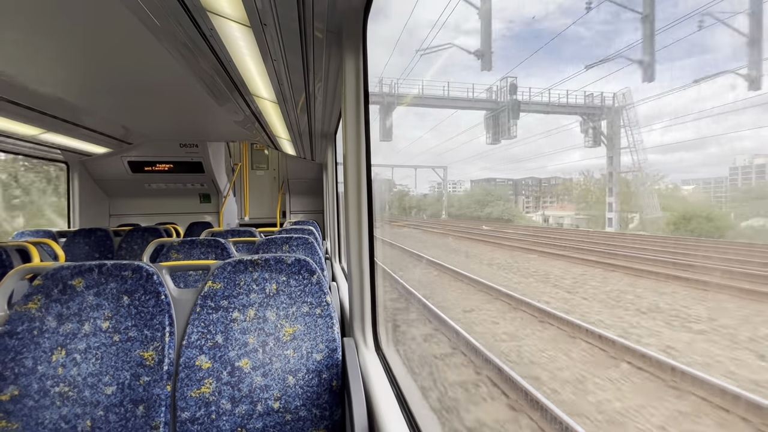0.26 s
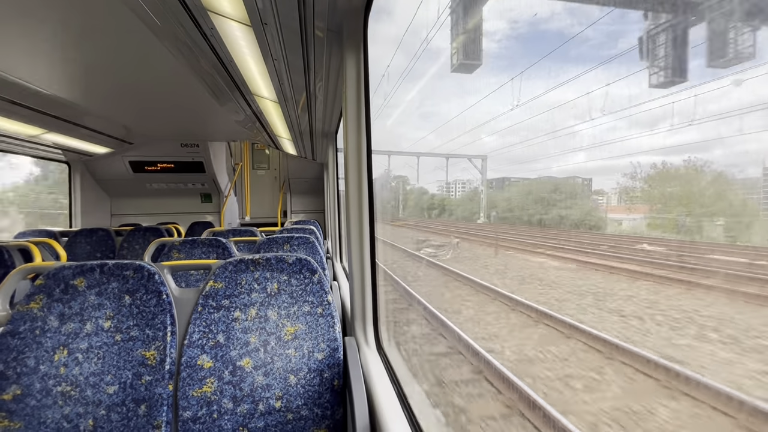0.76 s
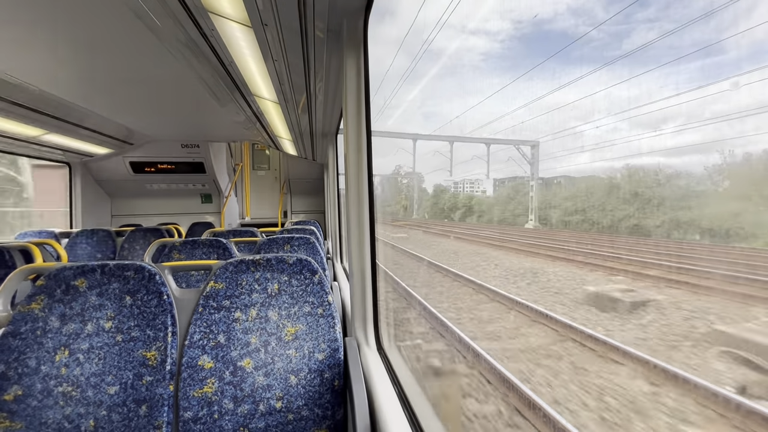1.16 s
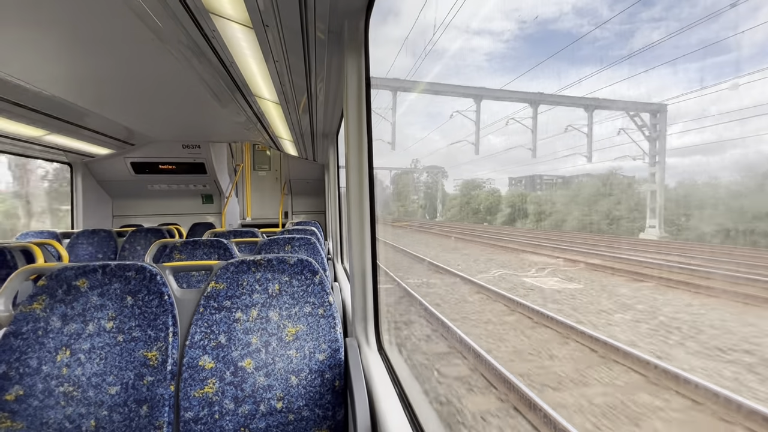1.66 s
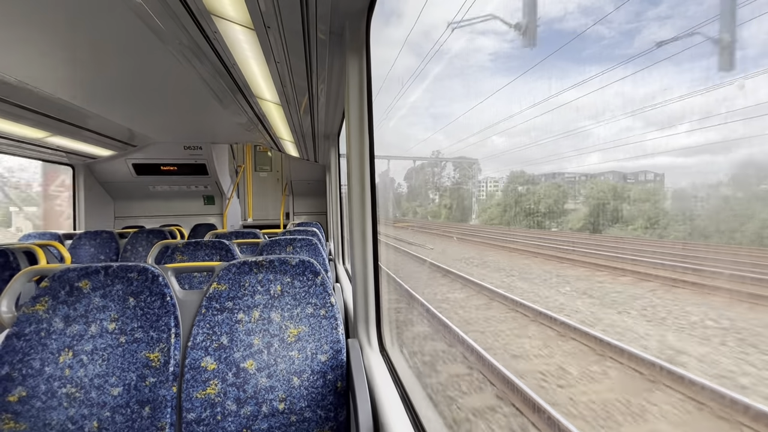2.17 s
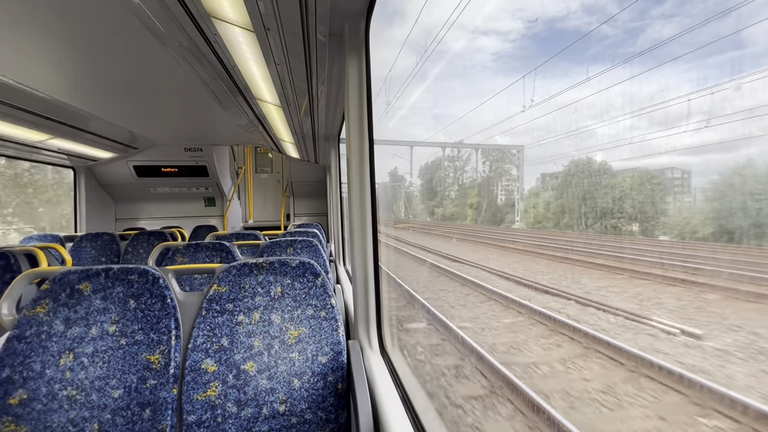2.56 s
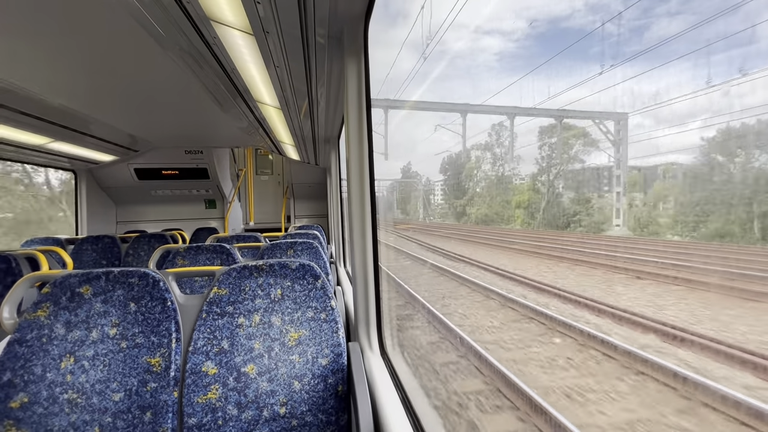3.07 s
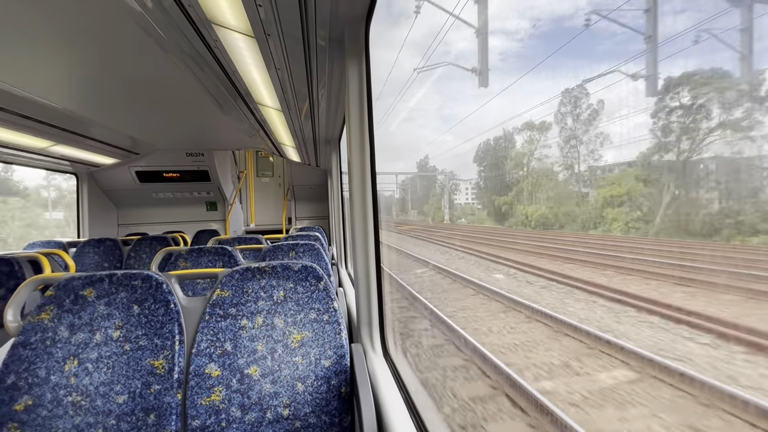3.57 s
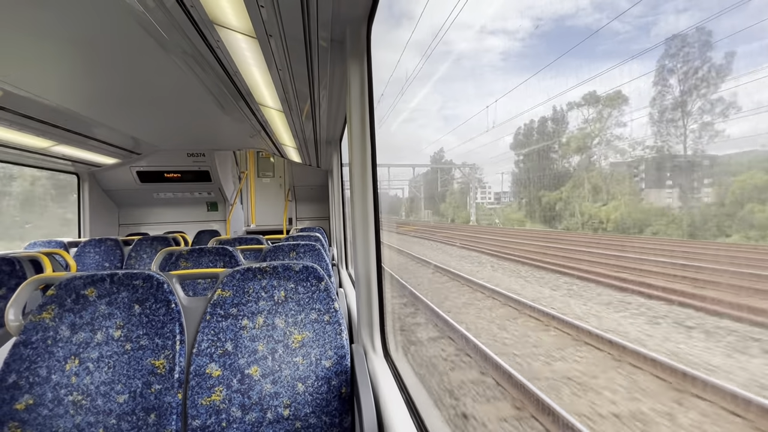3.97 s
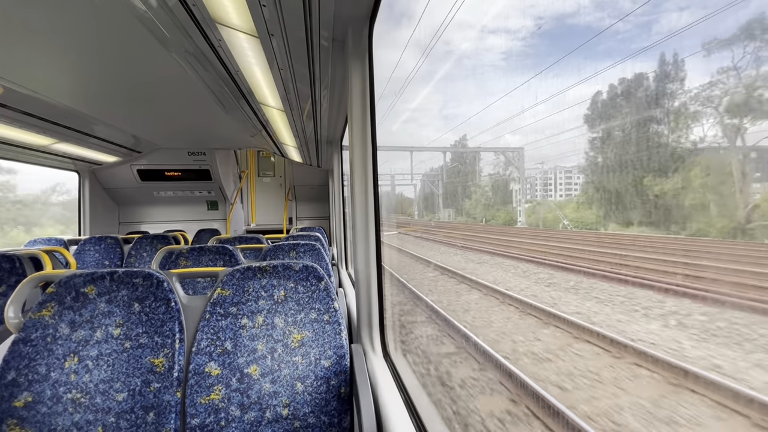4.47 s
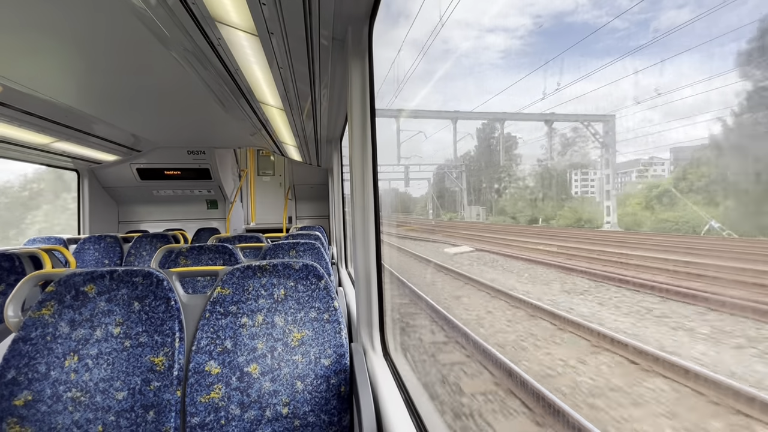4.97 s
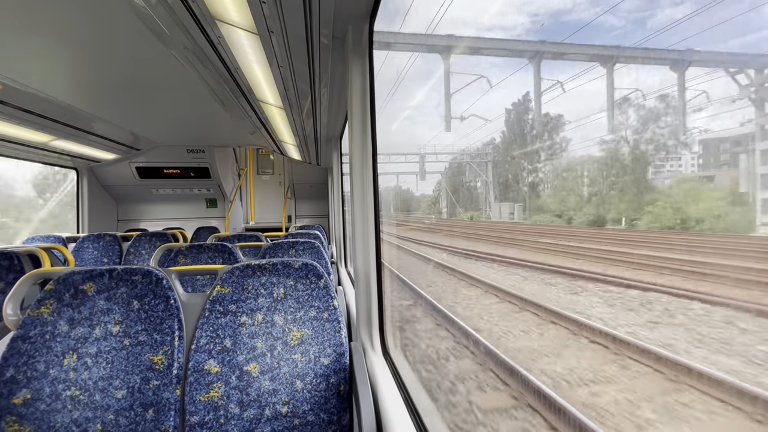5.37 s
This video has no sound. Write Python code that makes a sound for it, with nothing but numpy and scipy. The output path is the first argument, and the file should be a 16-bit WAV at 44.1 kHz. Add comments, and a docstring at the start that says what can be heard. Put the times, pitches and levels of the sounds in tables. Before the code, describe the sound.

Interior of an electric passenger train at steady speed, heard in stereo from a window seat. A deep boom throbs with irregular soft thuds, wall panels drone, and wheels roar through the floor, roughest at the start. Faint motor hums and a steady whine sit inside. Ventilation hisses thinly above. One sharp plastic tick comes close by early on; a light rattle comes near the end.

```python
"""Electric train interior

An electric passenger train runs steadily on welded track, heard from a window seat.
Bumps jolt the shell's boom and the large wall panels; smaller panels drone above.
Shaped noise roars through floor and wheels; machine hums are wavering sines.
Ventilation hisses with a thin, fluttering whistle of narrow noise bands.
Close by, decaying sines make one sharp tick; swells of bright noise make faint rustles and a light rattle."""
import sys
import numpy as np
from scipy import signal
from scipy.fft import rfft, irfft
from scipy.io import wavfile
from scipy.ndimage import uniform_filter1d

SR = 44100
rng = np.random.default_rng(int(sys.argv[2]) if len(sys.argv) > 2 else 0)


def output_pcm(signal):
    """Save a mono or channel-first signal as 16-bit PCM at the path in sys.argv[1].

    Samples are clipped to [-1, 1] before scaling.
    """
    pcm = np.clip(np.atleast_2d(signal).T, -1, 1) * 32767
    wavfile.write(sys.argv[1], SR, np.round(pcm).astype(np.int16))


N = 247401
T, HZ = np.arange(N) / SR, np.fft.rfftfreq(N, 1 / SR)


def amp(db):
    """Decibels to gain."""
    return 10 ** (np.asarray(db) / 20)


def unit(x):
    """Scales a sound to rms 1."""
    return x / np.sqrt(np.mean(x ** 2) + 1e-20)


def over_time(rows):
    """Joins (time [s], value) rows by straight lines with rounded corners."""
    line = np.interp(T, *np.transpose(rows))
    return uniform_filter1d(uniform_filter1d(line, size=800), size=800)


def over_hz(rows):
    """Joins (frequency [Hz], value) rows on a log-frequency axis."""
    hz, value = np.transpose(rows)
    return np.interp(np.log(HZ + 1), np.log(hz + 1), value)


def pan(side_db):
    """Left and right gains for a left-right level difference."""
    return amp(np.array([[side_db], [-side_db]]) / 2)


def drift(rate_hz):
    """A slow random wander of rms 1."""
    lowpass = np.exp(-(HZ / rate_hz) ** 2) * (HZ > 0)
    return unit(irfft(rfft(rng.standard_normal(N)) * lowpass, N))


def peak(hz, width_hz):
    """Magnitude of one resonance, 1 at its centre, -3 dB at the edges of its width."""
    return 1 / np.sqrt(1 + (2 * (HZ - hz) / width_hz) ** 2)


def cabin_noise(gain):
    """Stereo noise of rms 1 filling the car: long waves reach both sides alike, short ones diffusely."""
    # left-right likeness: (frequency [Hz], correlation [0-1])
    likeness = [(100, .993), (200, .985), (330, .92), (430, .55), (520, .15), (660, .42), (950, .12),
                (1290, .42), (1480, .15), (1630, .33), (1850, .08), (9000, .02)]
    # phase by which left leads: (frequency [Hz], lead [rad])
    lead = [(60, 0), (430, -.05), (620, -1.4), (900, -1.2), (1250, -3.5), (1600, -4.7), (2000, -6.2)]
    # left-right balance: (frequency [Hz], difference [dB])
    balance = [(60, -2), (190, -0.5), (300, -2.5), (430, -1), (640, -4), (800, 0.5), (1100, 2), (1700, 2.5),
               (2600, 3), (3800, 7.5), (6600, 7), (7600, 5), (8700, -1.5), (10000, -1.5)]
    left, other = rng.standard_normal((2, len(HZ))) + 1j * rng.standard_normal((2, len(HZ)))
    same = np.clip(over_hz(likeness), 0, 1)
    right = same * left + np.sqrt(1 - same ** 2) * other
    right = right * np.exp(-1j * over_hz(lead))
    lean = amp(over_hz(balance) / 2)
    gain = gain / (1 + (HZ / 12000) ** 24)  # the very top rolls off
    return unit(irfft(np.array([left * lean, right / lean]) * gain, N))


def steadied(x, size):
    """Evens out swells longer than size samples, so that a level curve can drive the noise."""
    window = signal.windows.hann(size)
    energy = signal.fftconvolve((x ** 2).mean(0), window, "same")
    power = energy / signal.fftconvolve(np.ones(N), window, "same")
    return x / np.sqrt(abs(power) + 1e-9)


def wavering(x, wander_hz, rate_hz):
    """Lets the pitch of a ringing sound wander by wander_hz rms, by turning its analytic signal."""
    turn = np.exp(2j * np.pi * np.cumsum(wander_hz * drift(rate_hz)) / SR)
    return (signal.hilbert(x) * turn).real


def surges(rows, rise_s, fall_s):
    """Lift in dB from (time [s], lift [dB]) events that each swell to their peak and die away."""
    return sum(db * np.exp(-((T - s) / np.where(T < s, rise_s, fall_s)) ** 2) for s, db in rows)


def bursts(rows, length_s, width_share):
    """Short swells of narrow noise from (time [s], level [dB], frequency [Hz]) events."""
    out = np.zeros((2, N))
    for s, db, hz in rows:
        noise = steadied(cabin_noise(peak(hz, width_share * hz) ** 2), size=2500)
        out += noise * amp(db) * np.exp(-((T - s) / length_s) ** 2)
    return out


def hum(rows):
    """Sustained sines, each wavering in pitch and strength."""
    out = np.zeros((2, N))
    for hz, db, side_db, lag_rad, waver_db, wander_hz in rows:
        cycles = np.cumsum(hz + wander_hz * drift(rate_hz=3.57)) / SR
        phase = 2 * np.pi * (cycles + rng.random())
        tone = np.sqrt(2) * np.sin([phase, phase - lag_rad]) * pan(side_db)
        out += tone * amp(db + waver_db * drift(rate_hz=5.6))
    return out


def jolt_lift_db():
    """Bumps in the track jolt the car; every jolt builds up and dies away alike."""
    # bumps: (time [s], lift of the boom's drive [dB])
    jolts = [(.139, 7), (.19, 4.5), (.264, 9), (.374, 9.5), (.425, 9.5), (.608, 6.5), (.714, 4.5),
             (.772, 6.5), (.937, 9.5), (1.087, 8.5), (1.158, 7), (1.277, 10), (1.34, 7.5), (1.418, 8.5),
             (1.52, 10.5), (1.616, 8), (1.828, 6.5), (2.031, 6), (2.09, 7), (2.243, 8.5), (2.347, 6.5),
             (2.442, 5), (2.595, 8), (2.702, 7), (2.83, 10.5), (2.924, 9), (3.17, 8.5), (3.308, 9),
             (3.412, 10), (3.503, 7.5), (3.589, 2.5), (3.751, 3), (3.863, 7.5), (3.994, 2), (4.12, 6.5),
             (4.22, 4), (4.282, 4.5), (4.354, -0.5), (4.457, 2.5), (4.595, 4.5), (4.711, 8), (4.808, 7),
             (4.951, 4), (5.02, 4), (5.205, 7.5), (5.305, 6.5), (5.438, 8)]
    return surges(jolts, rise_s=0.025, fall_s=0.025)


def car_body(throb_db=-0.5, top_hz=112, bottom_hz=30):
    """Track and traction motors keep the shell booming; each bump jolts it into a short, deep thud."""
    # boom spectrum: (frequency [Hz], relative level [dB])
    boom = [(12, -53.5), (22, -31), (32, -20.5), (43, -11), (54, -2.5), (63, 5), (73, -7), (88, -4),
            (100, -9.5), (115, -27), (170, -61.5)]
    # traction motors: (frequency [Hz], level against the boom at 0 dB load [dB], left-right [dB],
    # right-side phase lag [rad], rms waver [dB], rms pitch wander [Hz])
    motor_hums = [(76.76, -2.5, -1, 0.0051, 1.5, 0.25), (85.24, -5.5, 0, 0.009, 1.1, 0.34)]
    # load on the motors, taken up part way through: (time [s], hum gain [dB])
    motor_load = [(0, -6), (1.3, -11), (2.1, 0), (2.9, 1), (4.8, 5), (5.61, -3)]
    # drive of the shell without jolts: (time [s], level [dB])
    boom_level = [(0, -31.5), (2, -31.5), (4.8, -27.5), (5.61, -30.5)]
    drive = cabin_noise(amp(over_hz(boom))) + hum(motor_hums) * amp(over_time(motor_load))
    level_db = over_time(boom_level) + jolt_lift_db() + throb_db * drift(rate_hz=14)
    shell = 1 / np.sqrt((1 + (HZ / top_hz) ** 16) * (1 + (bottom_hz / (HZ + 1)) ** 8))
    return irfft(rfft(steadied(drive, size=1900) * amp(level_db)) * shell, N)


def panels(wall_db=-34.5, wall_hz=121, wall_width_hz=28, lurch_s=0.051, jolt_share=0.36):
    """The large wall panels lurch on one low resonance; the smaller ones drone above it."""
    # swells and lulls of the wall as the car lurches: (time [s], lift [dB])
    lurches = [(.1, 3), (.46, -10), (.88, -3.5), (1.2, -5), (1.65, 2.5), (1.87, -4), (2.08, 0), (2.86, 4.5),
               (3.05, -6), (3.36, 2), (3.84, -15), (4.17, -5), (4.72, 2), (4.88, -2), (5.14, -4.5)]
    # drone spectrum: (frequency [Hz], relative level [dB])
    drone_spectrum = [(120, -36.5), (150, -5.5), (185, -2.5), (203, -6), (232, -1), (258, -9.5), (295, -12),
                      (335, -10.5), (380, -17), (440, -17), (700, -77.5)]
    # drone from one stretch of track to the next: (time [s], level [dB])
    drone_level = [(0, -36.5), (.25, -32.5), (.52, -36), (.8, -33), (1.1, -35), (1.55, -32), (1.72, -35),
                   (1.84, -32), (2.55, -35), (3.5, -34), (4.25, -34.5), (4.4, -33.5), (5.05, -33.5),
                   (5.2, -34), (5.61, -35.5)]
    lift_db = surges(lurches, lurch_s, lurch_s) + jolt_share * jolt_lift_db()
    wall = steadied(cabin_noise(peak(wall_hz, wall_width_hz) ** 2), size=4500)
    drone = steadied(cabin_noise(amp(over_hz(drone_spectrum))), size=5000)
    return wall * amp(wall_db + lift_db) + drone * amp(over_time(drone_level))


def floor_roar(trim_db=-0.93):
    """The dull roar of the track, muffled by the floor."""
    # roar spectrum: (frequency [Hz], relative level [dB])
    roar_spectrum = [(250, -23.5), (380, -8.5), (440, 3), (490, 5.5), (540, -1.5), (600, -0.5), (645, 1),
                     (700, 1.5), (770, -6), (900, -25), (1400, -64)]
    # roar through the floor: (time [s], level before trim [dB])
    floor_level = [(0, -41.5), (0.65, -43), (2.25, -43.5), (2.7, -44), (3.7, -45.5), (4.05, -44),
                   (4.7, -42.5), (5.61, -45.5)]
    roar = steadied(cabin_noise(amp(over_hz(roar_spectrum))), size=14000)
    return roar * amp(over_time(floor_level) + trim_db)


def wheel_rings(wander_share=0.01405, shift_hz=7, swell_db=2.5):
    """The contact patch roams over the tread, so each ring comes and goes and shifts in pitch."""
    # wheel and rail rings: (frequency [Hz], width at -6 dB [Hz], relative level at the start [dB],
    # growth [dB/s])
    wheel_modes = [(663, 85, -12.5, 0), (929, 100, -9, 0.35), (1111, 69, -12, 0.17), (1635, 55, -13.5, -1),
                   (1882, 120, -16, 0)]
    out = np.zeros((2, N))
    for hz, width_hz, db, growth in wheel_modes:
        ring = wavering(cabin_noise(peak(hz, width_hz) ** 2), wander_share * hz, shift_hz)
        out += ring * amp(db + growth * T + swell_db * drift(shift_hz))
    return out


def wheels(trim_db=0.42, rush_db=-1.5, split_hz=1350, lumps_db=1.35):
    """Rail roughness rings the wheels; their lower and upper ringing swell apart."""
    # rolling spectrum: (frequency [Hz], relative level [dB])
    roll_spectrum = [(450, -39), (700, -9), (820, 3), (1020, 0.5), (1200, -1.5), (1480, -5.5), (1750, -8),
                     (1920, -10), (2100, -14.5), (2500, -18), (3200, -42), (6000, -61)]
    # upper ringing against lower: (time [s], gain [dB])
    roll_bright = [(0, -0.5), (2.5, 1.5), (3.3, 1.7), (4.2, -1.5), (4.6, 1.5), (5.61, 2)]
    # rail roughness, heard as rolling level: (time [s], level before trim [dB])
    roll_level = [(0, -43.5), (0.38, -42.5), (0.53, -46), (1.1, -46.5), (1.5, -45), (2.7, -47),
                  (3.6, -46.5), (4.3, -46), (5.05, -48.5), (5.35, -46), (5.61, -48)]
    rush = steadied(cabin_noise(amp(over_hz(roll_spectrum))), size=14000)
    roll = rush * amp(rush_db) + wheel_rings()
    lower = irfft(rfft(roll) / (1 + (HZ / split_hz) ** 10), N)
    upper = (roll - lower) * amp(over_time(roll_bright))
    lumpy = lower * amp(lumps_db * drift(rate_hz=11.0))
    return (lumpy + upper) * amp(over_time(roll_level) + trim_db)


def wheel_song(song_db=-63.5, ring_hz=922, width_hz=70, rise_s=0.088, fall_s=0.14):
    """One wheel keeps ringing faintly, and sings out on some patches of rail."""
    # patches of rail that make it sing: (time [s], lift [dB])
    singing = [(1.52, 7), (3.85, 10.5), (4.3, 16), (4.85, 9)]
    ring = cabin_noise(peak(ring_hz, width_hz) ** 2)
    return ring * amp(song_db + surges(singing, rise_s, fall_s))


def machines(whine_hz=486.5, whine_db=-49.5, side_db=-3, lag_rad=0.63, waver_db=1.96):
    """Auxiliary hums waver in strength, one coming and going, and one holds an unbroken whine."""
    # auxiliaries: (frequency [Hz], level [dB], left-right [dB], right-side phase lag [rad],
    # rms waver [dB], rms pitch wander [Hz])
    aux_hums = [(194.8, -47, -0.5, -0.5, 1.9, .5), (209.1, -42, 0, -1, 3, .4), (341.8, -55, -10, 0, 1, .8),
                (464, -52.5, -5, 3.5, 3.5, 3)]
    phase = 2 * np.pi * whine_hz * T
    whine = np.sqrt(2) * np.sin([phase, phase - lag_rad]) * pan(side_db)
    return hum(aux_hums) + whine * amp(whine_db + waver_db * drift(rate_hz=3))


def ventilation(air_db=-57.5):
    """A smooth hiss of moving air."""
    # air spectrum: (frequency [Hz], relative level [dB])
    air_spectrum = [(900, -38.5), (2200, -1.5), (3300, 2.5), (4200, -0.5), (5100, -1), (5900, -3),
                    (6750, -2), (7400, -8), (7700, -11), (8600, -14.5), (9500, -17), (10200, -30.5),
                    (12500, -42)]
    return cabin_noise(amp(over_hz(air_spectrum))) * amp(air_db)


def whistle(flutter_db=4.0, whistle_db=-70.5, flare_s=0.045, flare_width_share=0.025):
    """A thin, breathy whistle: resonances flutter independently, and flares come on varied pitches."""
    # resonances: (frequency [Hz], width at -6 dB [Hz], relative level [dB])
    whistle_modes = [(6300, 260, -6.5), (6550, 150, -1), (6770, 330, -4), (5030, 160, -10),
                     (7400, 130, -10)]
    # flares: (time [s], level [dB], frequency [Hz])
    flares = [(.28, -61, 6650), (1.09, -66, 6400), (2.3, -63, 6540), (2.39, -59.5, 6680), (2.68, -68, 6760),
              (3.42, -63, 6530), (3.99, -61, 6520), (4.23, -64.5, 6600), (4.92, -62, 6340)]
    voices = np.zeros((2, N))
    for hz, width_hz, db in whistle_modes:
        voice = cabin_noise(peak(hz, width_hz) ** 2)
        voices += amp(db) * voice * amp(flutter_db * drift(rate_hz=24))
    steady = wavering(voices, wander_hz=39.87, rate_hz=8.8) * amp(whistle_db)
    return steady + bursts(flares, flare_s, flare_width_share)


def growls_and_thrums(length_s=0.038, width_share=0.27):
    """Short bursts: the wheels growl on rippled rail, and the floor thrums near 450 Hz."""
    # growls and thrums: (time [s], level [dB], frequency [Hz])
    growl_rows = [(.05, -52.5, 1790), (.07, -41, 1030), (.165, -42.5, 1040), (.18, -44.5, 676),
                  (4.3, -44.5, 920), (.23, -54, 1720), (.285, -39, 960), (.325, -50, 1730),
                  (.39, -40, 1020), (1.41, -41, 450), (1.96, -53, 1660), (2.12, -42, 455),
                  (2.36, -51, 1720), (2.5, -40.5, 450), (2.78, -54.5, 1640), (4.6, -40, 457),
                  (5.33, -39, 492)]
    return bursts(growl_rows, length_s, width_share)


def rustles():
    """Soft, slightly grainy brushes close by."""
    # brushes: (time [s], level [dB], length, two standard deviations of the swell [s])
    brushes = [(0.095, -69, 0.33), (3.637, -69.5, .1), (3.82, -74, 0.24), (5.08, -68, .05)]
    # their spectrum: (frequency [Hz], relative level [dB])
    brush_spectrum = [(2500, -25), (5500, 4.5), (8000, 0), (9500, -0.5), (10500, -11), (12500, -16),
                      (14000, -52)]
    swell = sum(amp(db) * np.exp(-2 * ((T - s) / length_s) ** 2) for s, db, length_s in brushes)
    grain = amp(2 * drift(rate_hz=300))
    return cabin_noise(amp(over_hz(brush_spectrum))) * swell * grain


def tick(rise_s=0.00091, right_late_s=0.00041):
    """A contact and its rebound ring a small piece of hard plastic, a little to the left."""
    # contacts: (time [s], peak before panning [dB], left-right [dB], ring frequency factor)
    contacts = [(.7014, -26, 5, 1), (.7036, -37, 10, .97)]
    # plastic rings: (frequency before the factor [Hz], relative level [dB], t60 [s])
    plastic_modes = [(4000, -21, 0.0028), (5200, -16, 0.0028), (6280, -15.5, 0.0095), (6380, -4, 0.003),
                     (8000, -4, 0.0021), (9150, -19, 0.0027), (11800, -34, 0.0028), (15200, -44, .003)]
    out = np.zeros((2, N))
    for s, db, side_db, pitch in contacts:
        near = (T > s) & (T < s + 0.05)
        age = np.maximum(T[near] - s - np.array([[0], [right_late_s]]), 0)
        ring = np.zeros_like(age)
        for hz, mode_db, t60 in plastic_modes:
            ring += amp(mode_db - 60 * age / t60) * np.sin(2 * np.pi * hz * pitch * age)
        ring *= 1 - np.exp(-(age / rise_s) ** 2)  # the contact builds up smoothly
        out[:, near] += amp(db) * pan(side_db) * ring / abs(ring).max()
    return out


def rattle(fall_s=0.018, rise_s=0.003):
    """Something small and loose chatters: each contact swells briefly and dies quickly."""
    # contacts: (time [s], level [dB])
    chatter = [(5.137, -63), (5.1455, -59), (5.163, -66)]
    # their spectrum: (frequency [Hz], relative level [dB])
    chatter_spectrum = [(3000, -18), (5800, 7), (8000, 2), (9500, 0), (10700, -11), (12500, -13),
                        (14000, -48)]
    knocks = np.zeros(N)
    for s, db in chatter:
        rise = np.clip((T - s) / rise_s, 0, 1)
        knocks += amp(db) * rise * np.exp(-abs(T - s) / fall_s)
    return cabin_noise(amp(over_hz(chatter_spectrum))) * knocks


def scene():
    """Everything heard from the seat."""
    running = car_body() + panels() + floor_roar() + wheels() + wheel_song() + machines()
    air = ventilation() + whistle()
    return running + air + growls_and_thrums() + rustles() + tick() + rattle()


def record(dry):
    """A 16 kHz band limit, with 4 ms fades at either end."""
    fade = np.clip(np.minimum(T, T[-1] - T) / 0.004, 0, 1)
    lowpass = signal.butter(12, 16000, fs=SR, output="sos")
    return signal.sosfilt(lowpass, dry * fade)


dry = scene()
out = record(dry)
output_pcm(out)
```